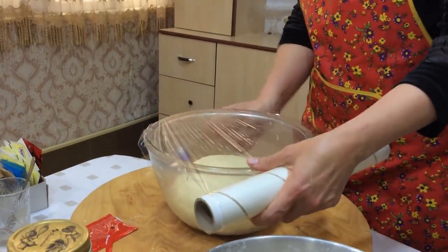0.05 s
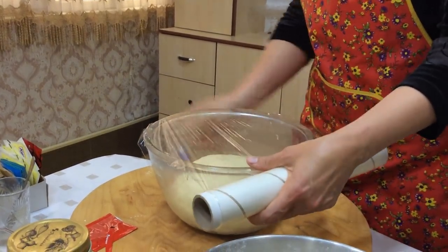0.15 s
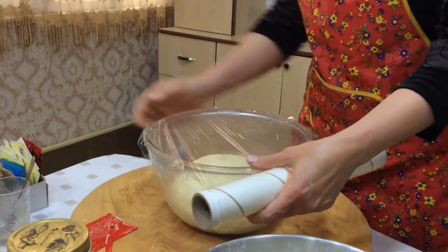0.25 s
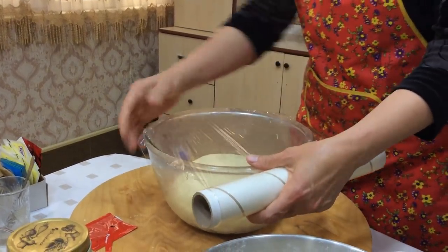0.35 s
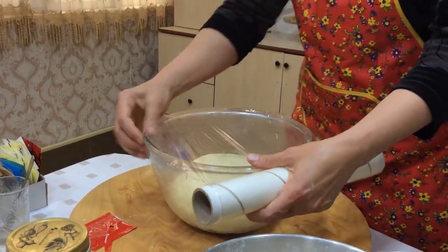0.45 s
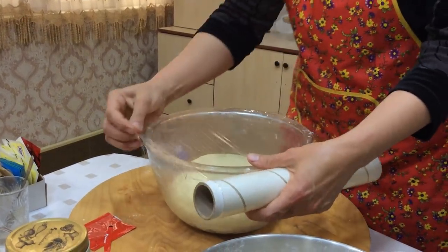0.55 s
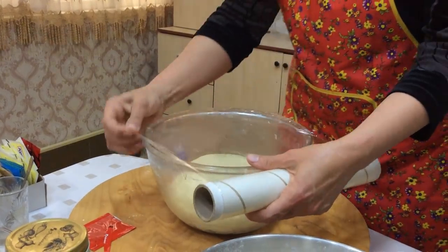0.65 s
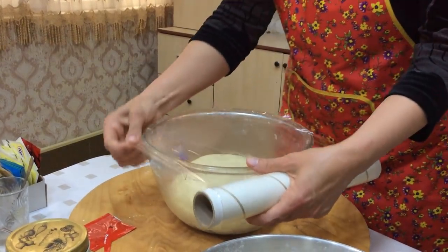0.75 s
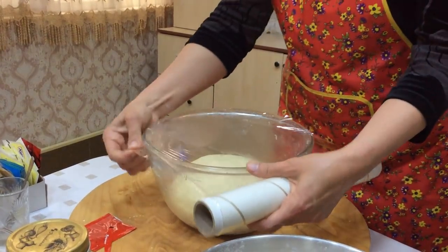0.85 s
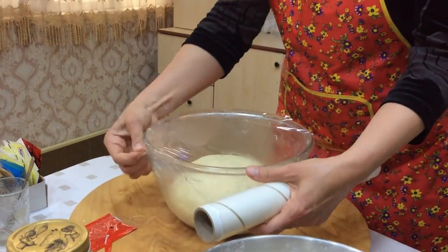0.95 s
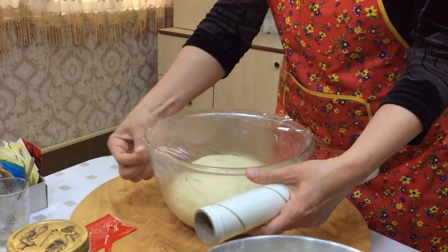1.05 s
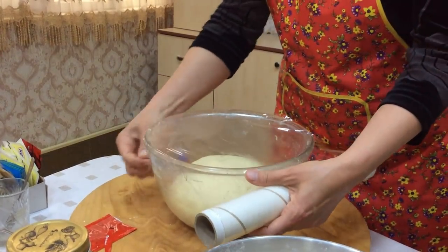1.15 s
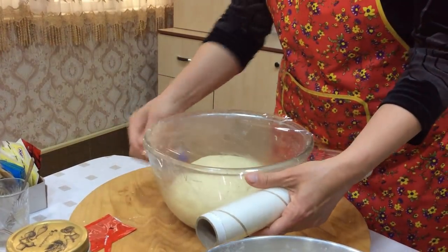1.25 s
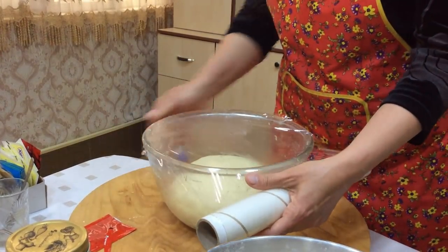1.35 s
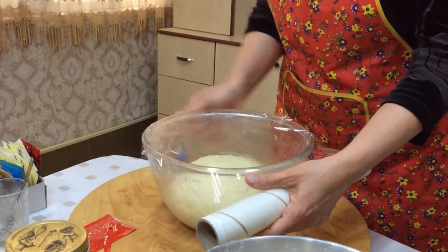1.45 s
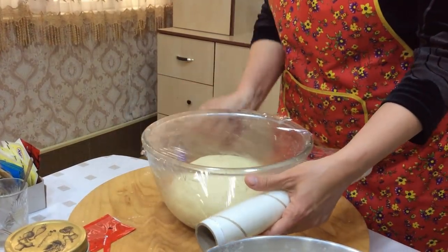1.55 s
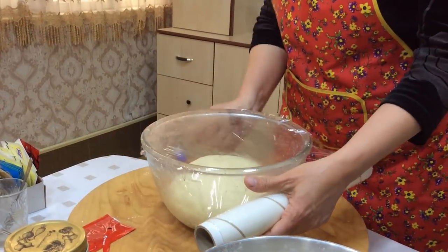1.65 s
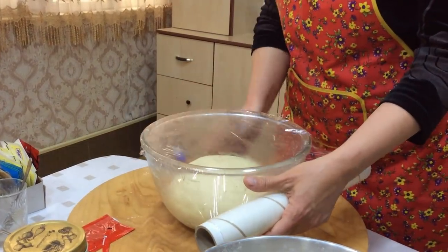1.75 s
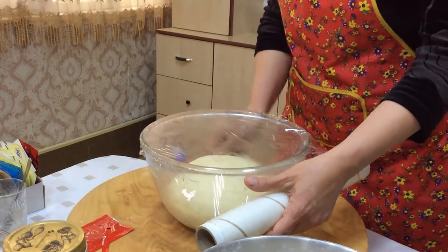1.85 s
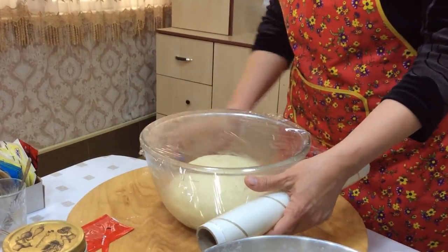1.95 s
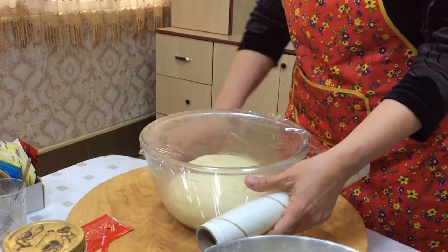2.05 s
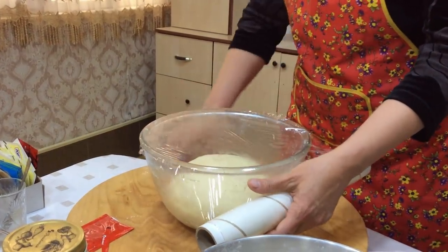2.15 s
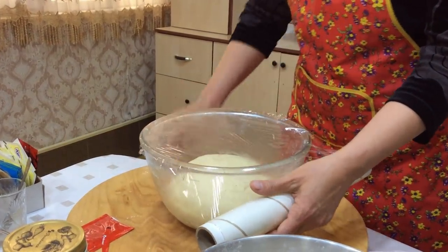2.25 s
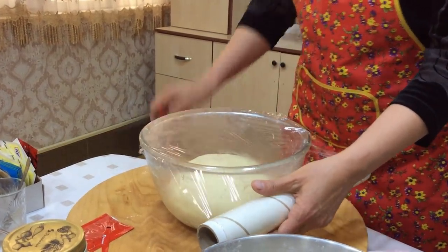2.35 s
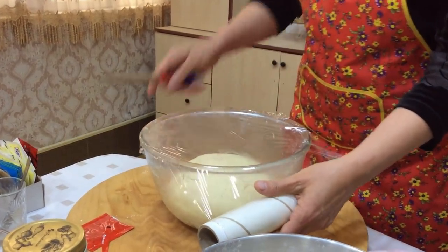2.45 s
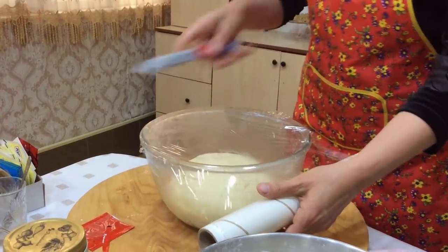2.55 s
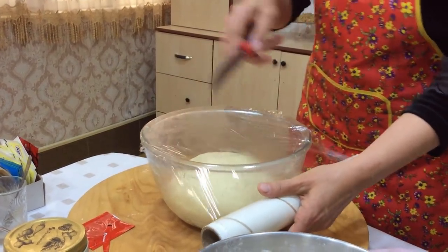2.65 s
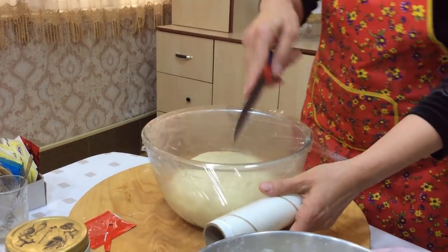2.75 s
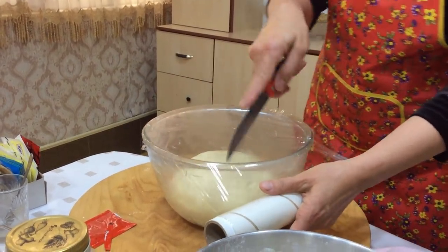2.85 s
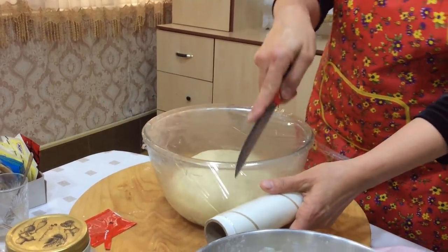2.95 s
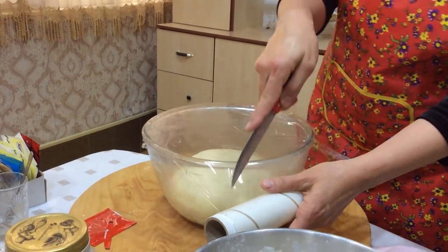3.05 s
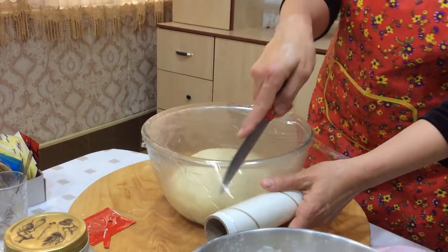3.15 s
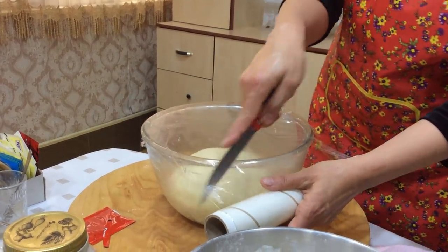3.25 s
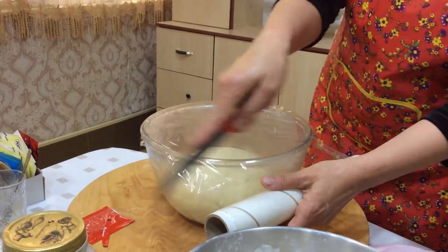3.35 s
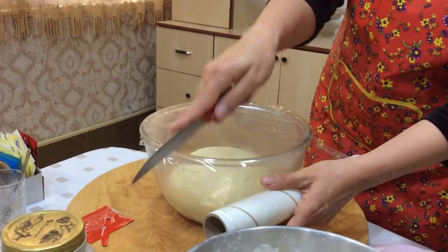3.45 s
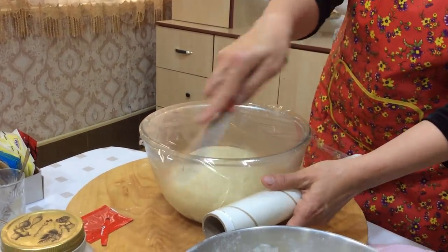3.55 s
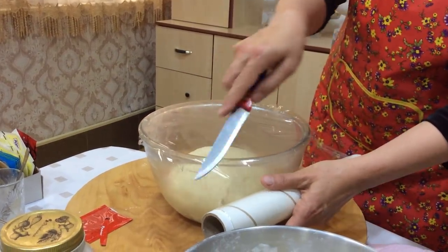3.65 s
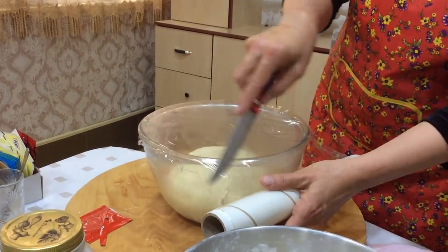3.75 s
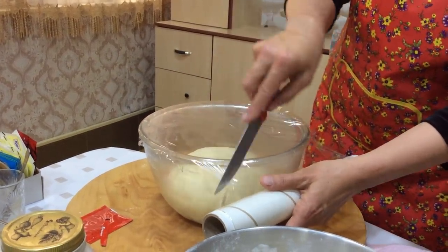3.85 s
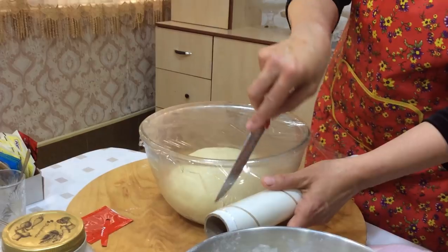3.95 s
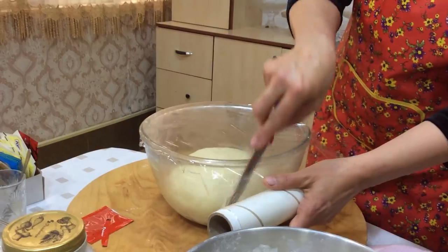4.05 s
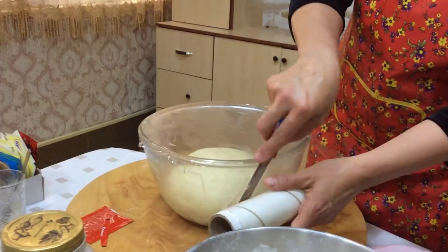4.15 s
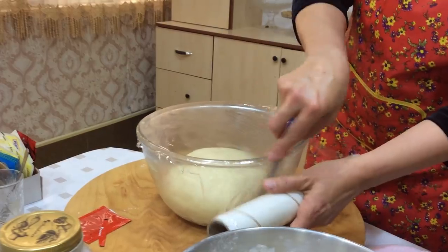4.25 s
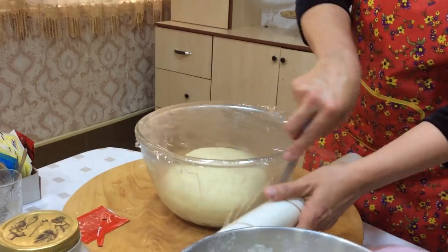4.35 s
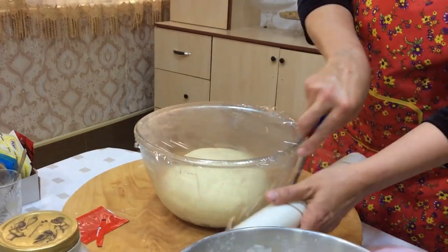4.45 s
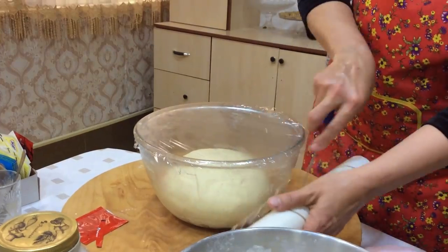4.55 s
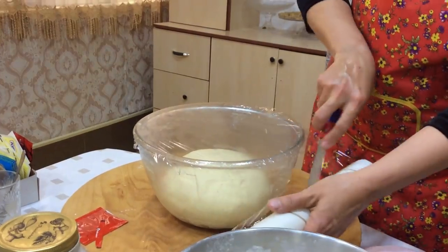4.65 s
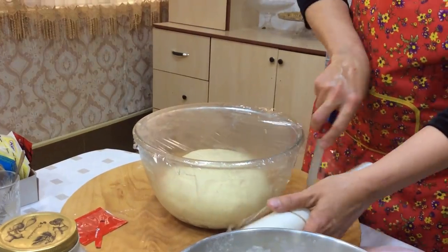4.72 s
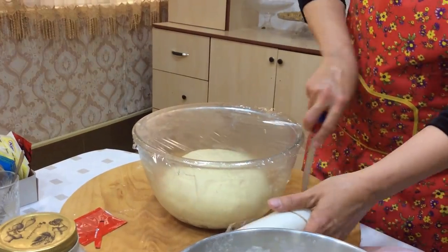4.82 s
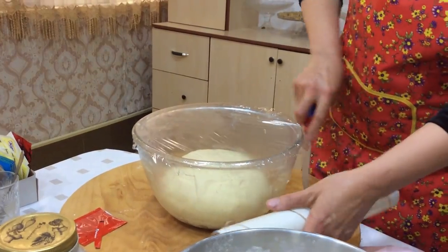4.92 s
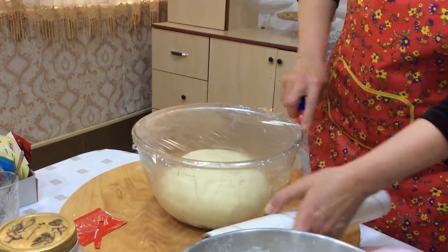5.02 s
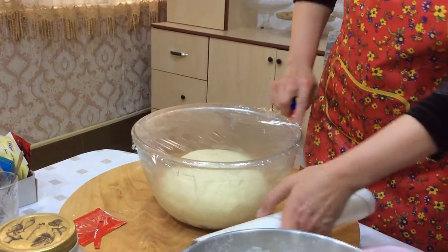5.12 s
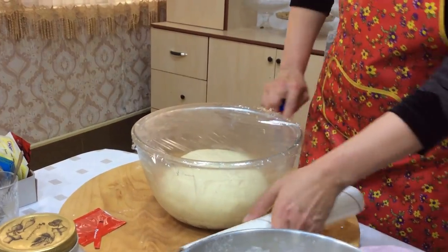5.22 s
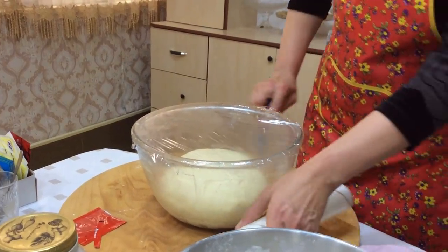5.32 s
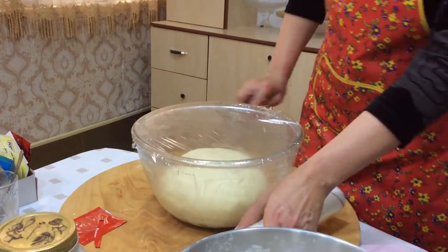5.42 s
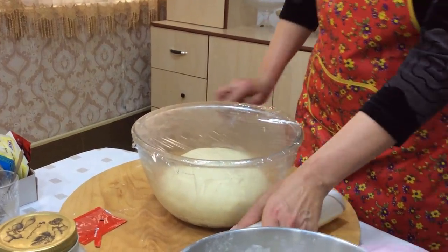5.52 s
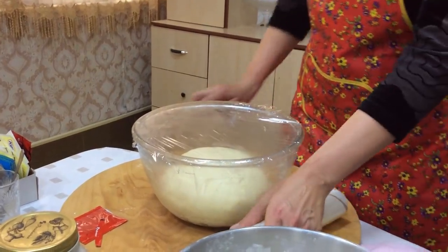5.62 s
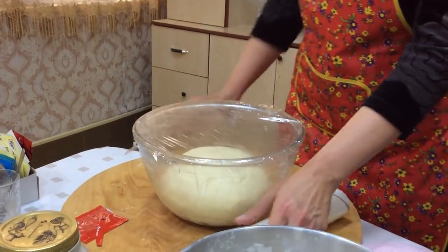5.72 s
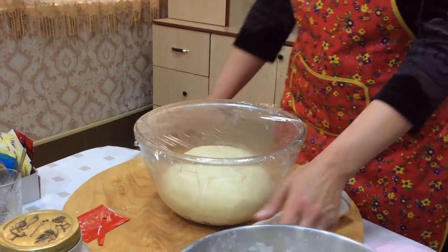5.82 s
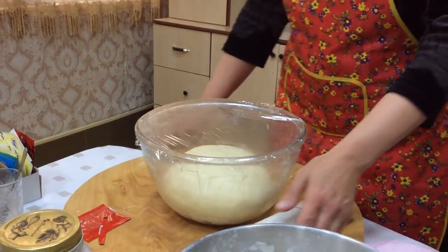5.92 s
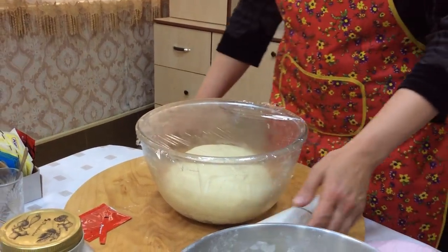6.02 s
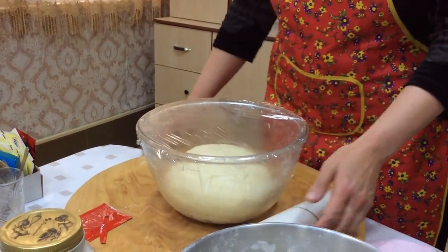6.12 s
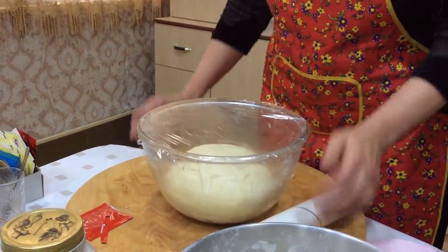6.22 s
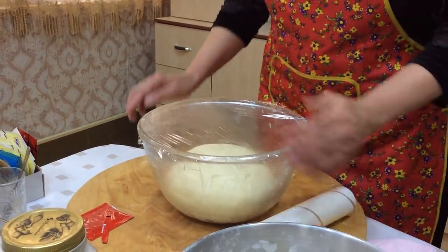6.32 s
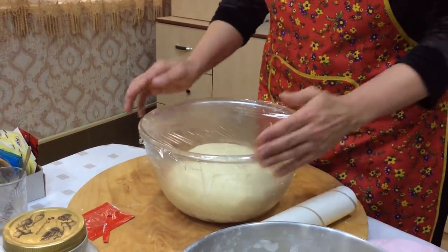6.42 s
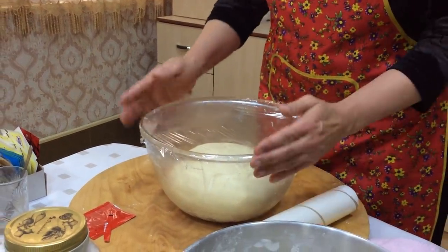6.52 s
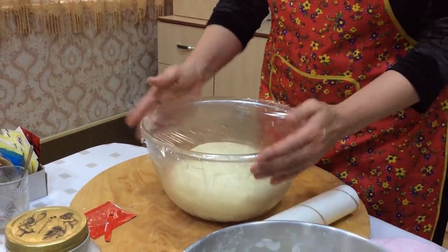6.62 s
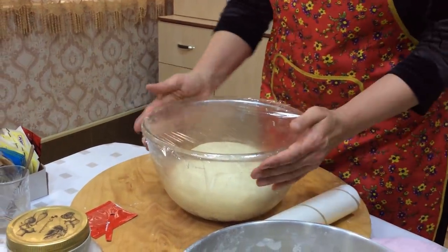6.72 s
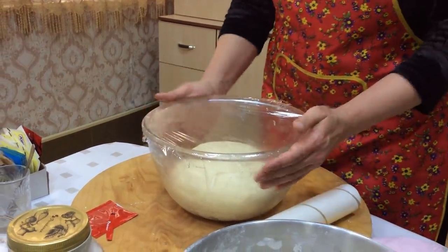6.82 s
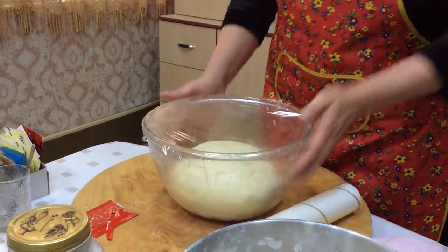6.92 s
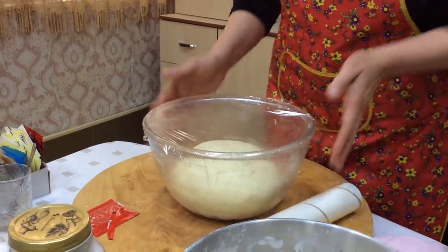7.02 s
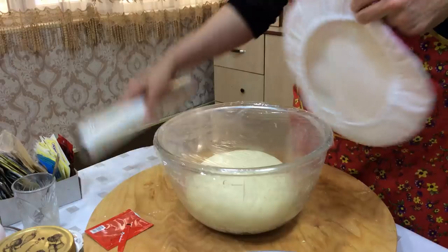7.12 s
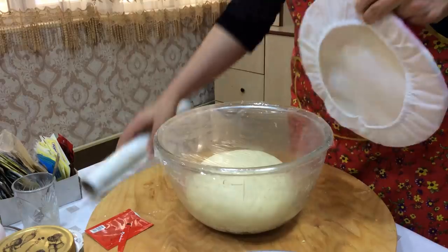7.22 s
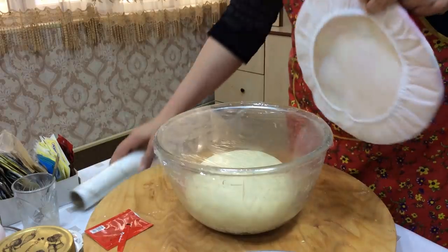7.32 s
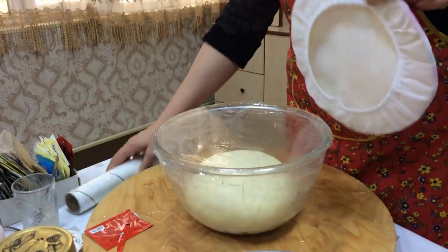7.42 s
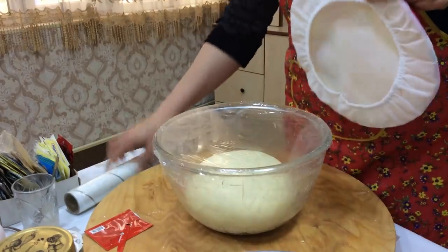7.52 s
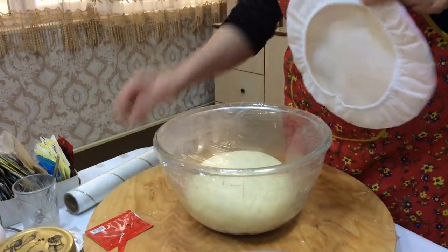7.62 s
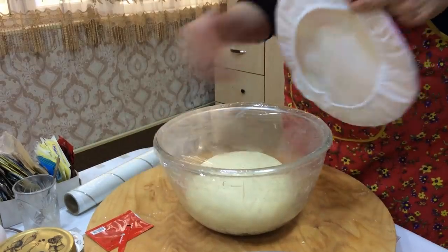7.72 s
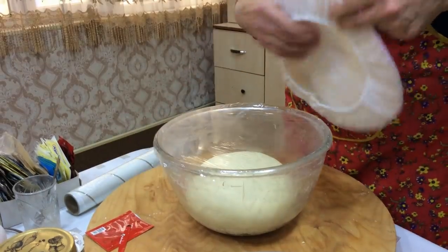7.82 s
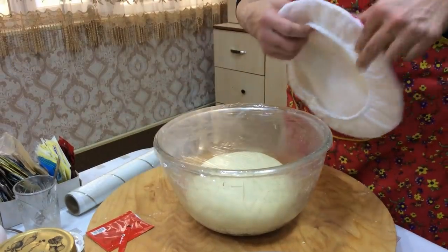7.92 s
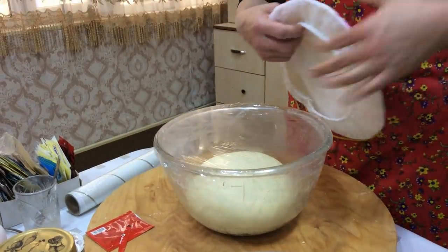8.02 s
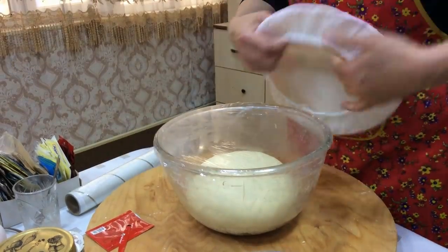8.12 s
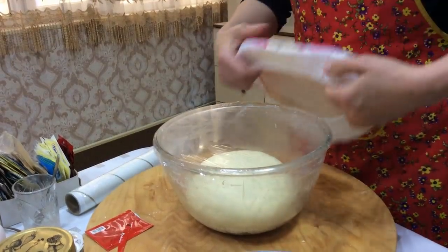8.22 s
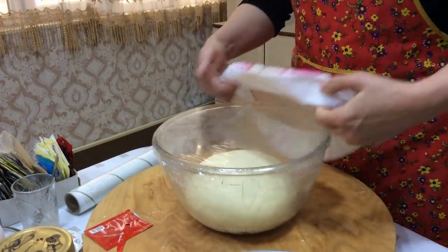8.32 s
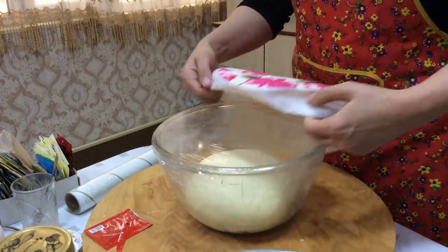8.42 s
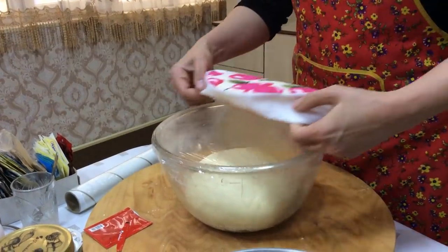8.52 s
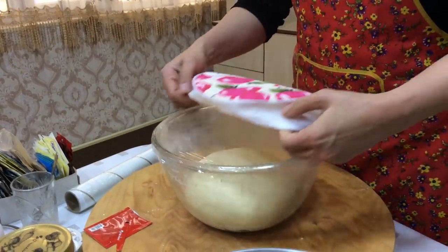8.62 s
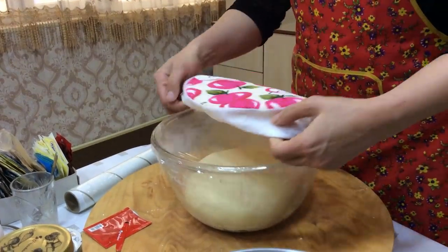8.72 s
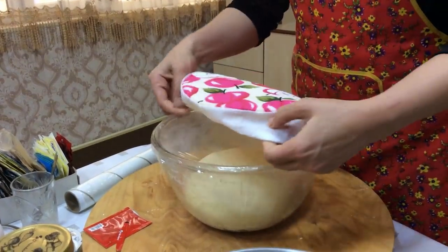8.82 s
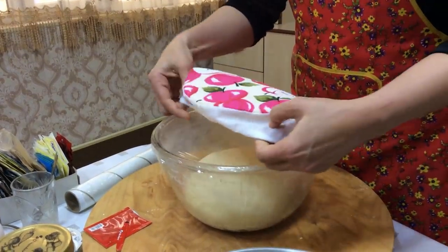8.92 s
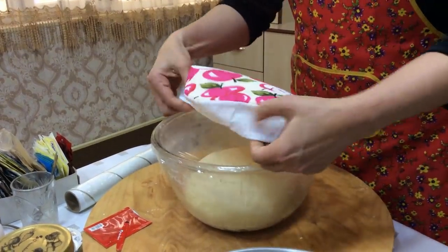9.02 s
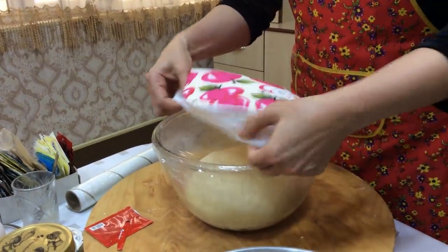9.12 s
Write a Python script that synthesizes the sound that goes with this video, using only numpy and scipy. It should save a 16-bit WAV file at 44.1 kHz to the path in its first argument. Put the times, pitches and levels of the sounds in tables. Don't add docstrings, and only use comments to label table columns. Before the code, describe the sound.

Cling film crinkles softly over a glass bowl, then a knife rips through it in sharp, crackling bursts before woody knocks in a quiet kitchen.

```python
import sys
import numpy as np
from scipy import signal
from scipy.fft import rfft, irfft, next_fast_len
from scipy.io import wavfile
from scipy.ndimage import uniform_filter1d

SR = 44100
rng = np.random.default_rng(int(sys.argv[2]) if len(sys.argv) > 2 else 0)


def output_pcm(signal):
    pcm = np.clip(np.atleast_2d(signal).T, -1, 1) * 32767
    wavfile.write(sys.argv[1], SR, np.round(pcm).astype(np.int16))


def elevation(decibels):
    levels = np.asarray(decibels, float)
    return 10 ** (levels / 20)


N = 404397

# (time [s], peak level [dB])
HAND_TAPS = [
    (2.148, -19),
    (2.188, -27),
    (2.23, -33),
    (2.25, -44),
]
ROLL_TAPS = [
    (5.637, -12.5),
    (5.676, -13.5),
    (5.728, -24),
]
ROLL_END_TAPS = [
    (.748, -40),
    (1.62, -42),
    (7.454, -23.5),
]
ROLL_FLAT_TAPS = [
    (7.557, -16.5),
    (7.566, -18),
    (7.625, -31.5),
    (7.715, -52),
]


def rms_one(x):
    return x / np.sqrt(np.mean(x ** 2) + 1e-20)


def at_hz(points, hz):
    table_hz, values = np.array(points).T
    return np.interp(np.log(hz + 1), np.log(table_hz), values)


def colour(x, spectrum):
    size = next_fast_len(N)
    gain = elevation(at_hz(spectrum, np.fft.rfftfreq(size, 1 / SR)))
    return rms_one(irfft(rfft(x, size) * gain, size)[:N])


def drift(rate_hz):
    r = np.exp(-80 * np.pi * rate_hz / SR)
    slow = signal.lfilter([1], [1, -2 * r, r * r], rng.standard_normal(N // 40 + 2002))[2000:]
    return np.interp(np.arange(N) / 40, np.arange(len(slow)), rms_one(slow))


def peak(x, hz, width_hz):
    r = np.exp(-np.pi * width_hz / SR)
    feedback = [1, -2 * r * np.cos(2 * np.pi * hz / SR), r * r]
    return signal.lfilter(np.array([1, 0, -1]) * (1 - r * r) / 2, feedback, x)


def effort(start, held, top_db, rise_db_per_s, fall_db_per_s):
    t = np.arange(0, N, 32)[:, None] / SR
    below_db = rise_db_per_s * np.clip(start - t, 0, None)
    below_db = below_db + fall_db_per_s * np.clip(t - start - held, 0, None)
    power = np.sum(elevation(2 * (top_db - below_db)), axis=1)
    return np.interp(np.arange(N) / 32, np.arange(len(t)), power)


def struck(taps, hz, mode_db, t60, rise_s, scatter=1):
    out = np.zeros(N)
    t = np.arange(int(min(t60.max(), .5) * SR)) / SR
    hz, mode_db, t60 = hz[:, None], mode_db[:, None], t60[:, None]
    phases = rng.random((len(taps), len(hz), 1))
    for (s, tap_db), phase in zip(taps, phases):
        softer_db = max(other_db for other_s, other_db in taps if other_s <= s) - tap_db
        ring_db = mode_db - 0.8 * softer_db * np.log2(hz / 300) - 60 * t / t60
        rings = np.sum(elevation(ring_db) * np.sin(2 * np.pi * (hz * t + scatter * phase)), axis=0)
        rings *= 1 - np.exp(-t / rise_s)
        i = round(s * SR)
        out[i:i + len(t)] += (elevation(tap_db) * rings / np.abs(rings).max())[:N - i]
    return out


def air():
    # (frequency [Hz], density [dB per Hz])
    air_spectrum = [(12, -54), (20, -28), (39, -13.5), (53, -3), (74, -7.5), (107, 2), (150, -9),
                    (204, -6.5), (434, -17), (738, -26), (1030, -34.5), (6540, -47.5), (8890, -31.5),
                    (14300, -47), (16000, -29.5)]
    return elevation(-53.5) * colour(rng.standard_normal(N), air_spectrum)


def fridge():
    # (frequency [Hz], width [Hz], level [dB])
    motor_lines = [(52, 10, -74), (101, 3.44, -51), (204.3, 4.55, -76), (437, 11.7, -68)]
    out = np.zeros(N)
    for hz, width_hz, line_db in motor_lines:
        cycles = np.cumsum(hz + 0.459 * width_hz * drift(width_hz)) / SR
        level_db = line_db + drift(3.9 * width_hz)
        out += np.sqrt(2) * elevation(level_db) * np.sin(2 * np.pi * cycles)
    return out


def shifting():
    # (time of full strength [s], held [s], rumble level [dB])
    nudges = [(0.02, 0.016, -50.5), (2.2, 0.078, -66), (3.3, 0.054, -39.5), (4.95, 0.1, -55),
              (5.8, 0.12, -55), (6.15, 0.029, -44), (7.55, 0.3, -50.5), (8.45, 0.18, -52.5),
              (8.1, 0.2, -57.5), (9.02, 0.11, -51), (7.3, 0.2, -52.5)]
    band = signal.butter(2, [115, 380], "band", fs=SR, output="sos")
    rumble = rms_one(signal.sosfilt(band, rng.standard_normal(N)))
    power = elevation(2 * -59) + effort(*np.transpose(nudges), rise_db_per_s=100, fall_db_per_s=97)
    lumps_db = -4 + 4.05 * np.tanh(drift(34))
    return np.sqrt(power) * elevation(lumps_db) * rumble


def knock(taps, spectrum, t60_s, rise_s):
    hz = np.geomspace(125, 6500, 110) * (1 + .015 * rng.standard_normal(110))
    t60 = t60_s * (hz / 500) ** -.6
    mode_db = at_hz(spectrum, hz) + 10 * np.log10(hz / t60) + 0.67 * rng.standard_normal(110)
    return struck(taps, hz, mode_db, t60, rise_s)


def knocks():
    # (time [s], peak level [dB])
    pickup_taps = [
        (1.555, -44),
        (2.304, -25.5),
        (2.321, -29.5),
        (2.345, -43),
    ]
    blade_taps = [
        (4.934, -20.5),
    ]
    knife_taps = [
        (5.965, -29),
        (6.11, -10.5),
        (6.1145, -12.5),
        (6.125, -21),
        (6.228, -39),
    ]
    # (frequency [Hz], density [dB per Hz])
    hand_colour = [(76, -46), (130, 0.5), (200, 0.5), (270, -15), (380, -10), (646, -10.5), (753, -9.5),
                   (904, -20), (1170, -16), (1690, -28), (2260, -25.5), (3400, -24.5), (4100, -43),
                   (5000, -36), (6500, -68), (11000, -120)]
    pickup_colour = [(180, -44), (300, -17), (749, -1.5), (871, -6.5), (1150, -7.5), (2000, -11),
                     (2500, -6), (3090, -11), (4250, -10), (4900, -24), (6000, -20), (7800, -68),
                     (13200, -120)]
    blade_colour = [(150, -41), (250, -3.5), (335, 2), (873, 3), (1180, -1), (1280, -4), (1840, -6),
                    (2180, -11), (6000, -29), (7800, -65), (13200, -120)]
    knife_colour = [(88, -42.5), (150, -18.5), (400, -7.5), (570, -3.5), (720, 1), (1120, -12.5),
                    (1410, -8.5), (1670, -17), (1860, -16.5), (2070, -19.5), (2750, -13), (3200, -27.5),
                    (4000, -40), (6000, -45), (7800, -74), (13200, -120)]
    roll_colour = [(71, -32), (120, -7.5), (200, -1), (296, -5), (372, -4), (560, -10.5), (846, -21),
                   (994, -34), (1150, -19), (1280, -32), (1600, -25), (3000, -44), (3900, -43),
                   (6600, -120)]
    roll_end_colour = [(71, -34), (120, -2), (167, 10.5), (321, 2), (739, -48), (866, -17), (1500, -83),
                       (1950, -81), (3300, -120)]
    roll_flat_colour = [(71, -40), (120, -5), (194, -5), (285, -12.5), (386, -2), (456, -6), (560, -4),
                        (693, -3.5), (1000, -19.5), (1050, -52), (2500, -47), (3250, -71), (5500, -120)]
    hand = knock(HAND_TAPS, hand_colour, t60_s=0.055, rise_s=0.00035)
    knife = knock(pickup_taps, pickup_colour, t60_s=0.12, rise_s=0.00021)
    knife += knock(blade_taps, blade_colour, t60_s=0.13, rise_s=0.00032)
    knife += knock(knife_taps, knife_colour, t60_s=0.052, rise_s=0.0011)
    roll = knock(ROLL_TAPS, roll_colour, t60_s=0.046, rise_s=0.0015)
    roll += knock(ROLL_END_TAPS, roll_end_colour, t60_s=0.045, rise_s=0.0011)
    roll += knock(ROLL_FLAT_TAPS, roll_flat_colour, t60_s=0.032, rise_s=0.0031)
    return signal.sosfilt(signal.butter(2, 125, "high", fs=SR, output="sos"), hand + knife + roll)


def clear_notes(taps, modes, level_db, rise_s):
    return elevation(level_db) * struck(taps, *np.transpose(modes), rise_s, scatter=.15)


def board():
    # (time [s], level [dB])
    knife_rings = [
        (5.965, -40),
        (6.11, -6.5),
        (6.1145, -13),
        (6.125, -17),
        (6.228, -27),
    ]
    # (frequency [Hz], level [dB], t60 [s])
    hand_modes = [(194, -5.5, 0.15), (382, -1, 0.17), (765, -1.5, 0.064), (996, -13, .09),
                  (1180, -16, 0.22)]
    knife_modes = [(316, -14, 0.16), (396, -9.5, 0.26), (420, -5, 0.28), (476, -23, 0.28), (691, 9, 0.085),
                   (867, -25, 0.11), (1166, -1, 0.14), (1250, -26, 0.16), (1383, -6, .2), (1590, -11, 0.3),
                   (2020, -20, 0.12), (248, -8.5, 0.091)]
    roll_modes = [(146.3, -0.5, 0.24), (250.6, -4, 0.29), (338, -0.5, 0.18), (420, 0, 0.27),
                  (603, -8, 0.17), (840, -21, 0.18), (1190, -24, 0.24), (1610, -9.5, .05)]
    roll_end_modes = [(198, -2.5, 0.72), (255, -1, 0.22), (319, -10, 0.17), (386, -6, 0.27)]
    roll_flat_modes = [(154, -16, 0.35), (194.5, -3.5, 0.14), (335, -10, 0.21), (370, -2, .13),
                       (420, -6, 0.12), (466, -5, 0.18), (519, -5.5, 0.16), (710, 1.5, 0.073),
                       (923, -16.5, 0.25)]
    return (clear_notes(HAND_TAPS, hand_modes, -7.5, rise_s=0.001)
            + clear_notes(knife_rings, knife_modes, -7, rise_s=0.0003)
            + clear_notes(ROLL_TAPS, roll_modes, -5, rise_s=0.0019)
            + clear_notes(ROLL_END_TAPS, roll_end_modes, -5.5, rise_s=0.0016)
            + clear_notes(ROLL_FLAT_TAPS, roll_flat_modes, -6, rise_s=0.0024))


def glass():
    # (frequency [Hz], level [dB], t60 [s])
    bowl_modes = [(1040, -5, 1), (1948, 9, 0.71), (1970, 11, 0.31)]
    # (time [s], level [dB])
    bowl_taps = [(.63, -62), (1.205, -62), (1.27, -56.5), (1.424, -54), (1.555, -64), (3.35, -48),
                 (4.68, -46), (6.531, -80), (6.712, -77), (6.9, -66)]
    # (time [s], level [dB], frequency [Hz], t60 [s])
    single_notes = [(0.624, -43, 1527, 0.027), (1.321, -54, 2740, 0.072), (1.427, -44.5, 406, 0.23),
                    (1.47, -60, 1040, 0.82), (1.555, -56, 1030, 0.48), (3.45, -53.5, 1040, 0.82),
                    (1.83, -61, 1940, 0.37), (6.941, -61.5, 1945, 0.37), (2.11, -59, 1450, .3),
                    (8.0, -54, 1240, 0.1), (1.553, -62, 2490, 0.045), (3.955, -50.5, 840, 0.029),
                    (4.015, -46.5, 820, 0.063), (4.06, -45, 780, 0.037), (4.791, -44, 386, 0.42),
                    (4.94, -46.5, 1510, 0.54), (4.94, -49, 1444, 0.53), (4.94, -39, 842, .2),
                    (3.403, -38, 940, 0.17), (3.403, -43, 1420, 0.18), (3.42, -42, 2290, .12),
                    (5.966, -35.5, 610, 0.06), (5.966, -45.5, 2840, 0.016), (6.228, -35.5, 680, 0.13),
                    (5.32, -63, 2750, 0.22), (6.008, -47, 2800, 0.026), (6.53, -68, 3130, 0.36),
                    (6.711, -64, 3070, 0.59), (6.901, -76, 3160, 0.58)]
    out = struck(bowl_taps, *np.transpose(bowl_modes), rise_s=0.0036)
    for s, note_db, hz, t60 in single_notes:
        out += struck([(s, note_db)], *np.transpose([(hz, 0, t60)]), rise_s=0.0024)
    return out


def stretch():
    # (time [s], frequency [Hz], level [dB])
    pull_curve = [(0.8, 401, -59), (0.88, 323.6, -53), (0.968, 321.5, -51), (0.996, 330, -68),
                  (1.02, 335, -54.5), (1.162, 385, -70), (1.2, 420, -70)]
    t = np.arange(N) / SR
    curve_s, curve_hz, curve_db = np.transpose(pull_curve)
    phase = 2 * np.pi * np.cumsum(np.interp(t, curve_s, curve_hz)) / SR
    level_db = np.interp(t, curve_s, curve_db)
    on = np.clip(np.minimum(t - curve_s[0], curve_s[-1] - t) / .02, 0, 1)
    return on * np.sqrt(2) * elevation(level_db) * (np.sin(phase) + elevation(-36) * np.sin(2 * phase))


def sliding():
    # (time of full strength [s], held [s], level [dB])
    slides = [
        (4.88, 0.066, -44),
        (5.0, .02, -48),
        (5.04, 0.021, -42),
    ]
    treble = signal.butter(2, 6500, "high", fs=SR, output="sos")
    hiss = rms_one(signal.sosfilt(treble, rng.standard_normal(N)))
    return np.sqrt(effort(*np.transpose(slides), rise_db_per_s=200, fall_db_per_s=800)) * hiss


def handling():
    # (time of full strength [s], held [s], bright rustle [dB], dull rustle [dB])
    hand_strokes = [(.18, 0.012, -60.5, -62), (.33, 0.038, -70, -59.5), (.57, .04, -57, -78),
                    (0.626, 0.0074, -48.5, -55), (.83, 0.22, -57.5, -70), (1.19, 0.1, -56, -67),
                    (1.32, 0.29, -82, -64), (1.43, 0.012, -79, -70), (1.555, 0.067, -65, -66.5),
                    (1.62, 0.12, -58, -61.5), (1.821, 0.038, -52.5, -67), (1.9, 0.17, -66, -65),
                    (2.15, .01, -57.5, -61), (2.31, 0.022, -59, -56), (2.52, 0.0092, -63.5, -83),
                    (5.35, 0.028, -78, -61.5), (5.66, 0.023, -55.5, -66), (5.79, 0.018, -63.5, -78),
                    (5.965, 0.1, -79, -59), (6.112, .002, -67, -52.5), (6.15, 0.021, -61.5, -54.5),
                    (6.53, 0.044, -58, -64), (6.742, 0.035, -50.5, -85), (6.88, 0.12, -52.5, -84),
                    (7.201, 0.098, -59.5, -65.5), (7.549, 0.087, -61.5, -60), (7.93, 0.07, -53.5, -59.5),
                    (8.19, 0.046, -58.5, -60.5), (8.35, 0.21, -61.5, -64.5), (8.6, 0.52, -67, -66.5)]
    blade_strokes = [(3.2, 0.022, -46, -46), (3.27, .005, -56, -49), (3.308, .03, -45, -43),
                     (3.352, .01, -42, -40), (3.375, 0.065, -36.5, -40), (3.96, 0.11, -62, -60.5),
                     (4.08, 0.092, -73, -55), (4.15, 0.015, -51, -42), (4.22, 0.015, -46.5, -37.5),
                     (4.328, .002, -37.5, -43), (4.35, 0.047, -29, -45), (4.42, .012, -37, -44.5),
                     (4.473, 0.028, -34.5, -44), (4.676, 0.048, -36.5, -42), (4.78, 0.024, -40.5, -48.5),
                     (4.55, .1, -47, -53), (4.84, 0.17, -51.5, -58.5), (5.0, 0.037, -54, -79)]
    hand, blade = np.transpose(hand_strokes), np.transpose(blade_strokes)
    levels_db = []
    for column, rest_db in ((2, -65.5), (3, -67)):
        power = elevation(2 * rest_db)
        power = power + effort(*hand[:2], hand[column], rise_db_per_s=324, fall_db_per_s=154)
        power = power + effort(*blade[:2], blade[column], rise_db_per_s=1299, fall_db_per_s=225)
        levels_db.append(10 * np.log10(power))
    return levels_db


def rustle():
    # (frequency [Hz], density [dB per Hz])
    crinkle_spectrum = [(1800, -21), (2400, -19), (3680, -14.5), (4930, -12), (6560, -8), (13200, -8),
                        (15500, -10)]
    rub_spectrum = [(290, -2.5), (500, 1.5), (771, 0.5), (917, 2.5), (1260, -0.5), (1430, 1), (5000, -7),
                    (6500, -18.5), (11000, -120)]
    bright_db, dull_db = handling()
    sizes = elevation(3.6 * np.minimum(rng.exponential(1, N), 3)) * rng.choice([-1, 1], N)
    creases_per_s = 3500 * elevation(4 * drift(25))
    grains = rms_one(sizes * (rng.random(N) < creases_per_s / SR))
    grainy = np.clip((bright_db + 62) / 25, 0, .6)
    mix = np.sqrt(grainy) * grains + np.sqrt(1 - grainy) * rng.standard_normal(N)
    bright = elevation(bright_db + 1.8 * drift(27)) * colour(mix, crinkle_spectrum)
    bright += 2.04 * grainy * peak(bright, 2900, 1600)
    rub = colour(0.4 * mix + rng.standard_normal(N), rub_spectrum)
    return bright + elevation(dull_db + 3.45 * np.tanh(drift(26))) * rub


def snaps(rows, splinter_db):
    # (frequency [Hz], width [Hz], level [dB])
    skin_modes = [(335, 250, 7), (598, 86, 14.5), (820, 83, 12.5), (1503, 110, 5)]
    bright, thud = np.zeros(N), np.zeros(N)
    t = np.arange(512) / SR
    for s, snap_db, hz, thud_db in rows:
        white = rng.standard_normal(512)
        burst = elevation(splinter_db) * white * elevation(-60 * t / .011)
        burst[:4] += [-.7, -.7, 1.6, .9]
        ringing = peak(burst, np.clip(hz, 1500, 14000), 0.89 * hz)
        burst = ringing + 0.12 * burst + 0.14 * np.diff(burst, prepend=0)
        lag = int(75 + 20 * np.tanh(white[-1]))
        burst += 0.28 * np.roll(burst, lag) * (t > lag / SR)
        i = round((s + .0006) * SR)
        bright[i:i + 512] += elevation(snap_db) * burst / np.abs(burst).max()
        thud[i] += elevation(snap_db + thud_db)
    skin = np.zeros(N)
    for k, (hz, width_hz, mode_db) in enumerate(skin_modes):
        skin += (-1) ** k * elevation(mode_db) * peak(thud, hz, 0.78 * width_hz)
    bright = signal.lfilter(*signal.butter(2, 1350, "high", fs=SR), bright)
    return bright + elevation(15) * skin


def film_snaps():
    # (time [s], peak level [dB], centre frequency [Hz], drum-skin thud relative to the snap [dB])
    pulling = [(0.5646, -36, 7470, -27), (0.5904, -33, 9200, -22), (0.626, -23.5, 5100, -21),
               (0.6354, -29, 9390, -6), (0.6524, -32, 9400, -4), (0.7567, -43, 8820, -15),
               (0.82, -35.5, 9240, -31), (0.8405, -29, 12400, -42), (0.8974, -33, 9940, -29),
               (0.9512, -38, 7420, -25), (0.9602, -31, 10900, -33), (0.9764, -43, 11700, -28),
               (0.9981, -35, 11100, -32), (1.0745, -34, 7600, -33), (1.2506, -33.5, 9530, -34),
               (1.3219, -38, 2780, -18), (5.783, -39, 11500, -40), (5.9655, -40, 5000, -30),
               (6.009, -41, 6000, -30), (6.1145, -31.5, 6000, -27), (6.7436, -45, 3140, -25),
               (7.9209, -49.5, 2420, 12)]
    first_slit = [(3.1914, -13.5, 4930, -6), (3.2011, -37, 4000, -22), (3.2163, -26, 6100, -25),
                  (3.2684, -19.5, 5040, -12), (3.2766, -26, 2770, -30), (3.3053, -32, 3000, -20),
                  (3.3118, -17, 4500, -5), (3.3222, -21, 4500, -15), (3.3265, -20, 7000, -8),
                  (3.3356, -20, 6000, -3), (3.3483, -7, 3370, -5.5), (3.35, -28, 4500, -13),
                  (3.3732, -10, 7000, -14), (3.3772, -20, 4500, 6), (3.3859, -10, 4500, -8),
                  (3.3953, -4, 4170, -7.5), (3.3985, -9, 4960, -13), (3.3995, -4.5, 4280, -33)]
    second_slit = [(4.0518, -23.5, 7500, -14), (4.068, -31.5, 6000, -10), (4.093, -17, 8000, -17),
                   (4.0957, -17.5, 2980, -20), (4.1078, -33, 6000, -25), (4.1233, -19, 3460, -12),
                   (4.14, -19.5, 4460, -19), (4.1477, -5, 4770, -24), (4.1574, -30, 5030, -25),
                   (4.2068, 0, 5100, -12.5), (4.218, -26, 6000, -11), (4.222, -19, 4210, -22),
                   (4.224, -24, 9000, -28), (4.2274, -4.5, 7950, -39), (4.2323, -8, 5000, -19),
                   (4.3235, -18, 2960, -32), (4.326, -8, 5050, -41), (4.3364, -7, 5940, -49),
                   (4.348, -10, 7000, -10.5), (4.3482, -2.5, 8000, -33), (4.3635, -11, 7500, -40),
                   (4.375, -13, 7500, -53), (4.3929, -4.5, 6200, -25), (4.414, -15, 6350, -26),
                   (4.4397, -18, 6490, -41), (4.448, -10, 5020, -36), (4.4524, -13, 6600, -33),
                   (4.472, -10.5, 4600, -15), (4.4964, -16, 4860, -35), (4.5108, -17.5, 6000, -40),
                   (4.5904, -15.5, 9300, -33), (4.5979, -19, 9450, -28), (4.679, -14.5, 5300, -19),
                   (4.7776, -20, 5560, -10), (4.7851, -7.5, 7600, -36)]
    further_slit_snaps = [(3.4095, -17, 4500, -15), (3.414, -19, 6500, -8), (3.4015, -26, 4300, -17),
                          (3.955, -38.5, 6500, -20), (4.2095, -25.5, 5500, -18.5), (4.3371, -14, 6000, -39),
                          (4.3502, -14, 9000, -22), (4.3518, -11, 5000, -29.5), (4.3955, -25, 12000, -39),
                          (4.398, -13, 12000, -40), (4.4775, -16, 6000, -35), (4.49, -17, 10000, -40),
                          (4.5702, -34, 8000, -35), (4.694, -22, 6000, -26), (4.716, -22, 6000, -30),
                          (4.803, -19, 7000, -30)]
    slitting = [*first_slit, *second_slit, *further_slit_snaps]
    return snaps(pulling, splinter_db=-5) + snaps(slitting, splinter_db=-8.5)


def kitchen(x):
    # (frequency [Hz], t60 [s])
    room_decay = [(100, 0.79), (300, 0.35), (800, 0.41), (2000, 0.48), (5000, 0.54), (14000, 0.25)]
    t = np.arange(int(.7 * SR)) / SR
    tail = np.zeros(len(t))
    for low in 60 * 2 ** np.arange(8):
        band = signal.butter(2, [low, 2 * low], "band", fs=SR, output="sos")
        fade = elevation(-60 * t / at_hz(room_decay, 2.7 * low))
        tail += signal.sosfilt(band, rng.standard_normal(len(t))) * fade
    lines = signal.stft(tail, nperseg=2048, noverlap=1536)[2]
    power = uniform_filter1d(np.abs(lines) ** 2, size=5, axis=1) + 1e-20
    broad, narrow = uniform_filter1d(power, size=40, axis=0), uniform_filter1d(power, size=3, axis=0)
    tail = signal.istft(lines * np.sqrt(broad / narrow), nperseg=2048, noverlap=1536)[1][:len(t)]
    tail *= np.clip((t - .003) / 0.0021, 0, 1)
    return signal.fftconvolve(x, tail / np.sqrt(np.sum(tail ** 2)))[:N]


def scene():
    film, wood = film_snaps(), knocks()
    dull = signal.lfilter(*signal.butter(1, 1800, fs=SR), wood)
    room = kitchen(elevation(-10) * film + elevation(-7.5) * dull)
    table = elevation(-2.5) * wood + board() + shifting()
    sheet = film + rustle() + stretch() + sliding()
    return (air() + fridge() + table + glass() + sheet + room)[None]


def thin_out(x):
    # (moment number [1024 samples each], thinned above [Hz])
    starved = [(3, 2100), (79, 500), (80, 500), (89, 1100), (102, 3800), (107, 2400), (123, 2400),
               (148, 4500), (161, 1700), (163, 2100), (202, 20), (207, 700), (254, 1200), (256, 1200),
               (264, 3600), (266, 3300), (280, 1400), (292, 700), (298, 700), (304, 1000), (318, 1000),
               (319, 1800), (340, 1900), (345, 2800), (349, 1300), (358, 1200)]
    out, hz = x.copy(), np.fft.rfftfreq(2048, 1 / SR)
    window = np.sqrt(np.hanning(2048))
    for moment, from_hz in starved:
        i = 1024 * moment - 957
        lines = rfft(x[i:i + 2048] * window)
        height = np.abs(lines) / uniform_filter1d(np.abs(lines), size=120) * (hz + 500) ** -.12
        high = hz > from_hz
        strongest = height > np.quantile(height[high], 1 - .05)
        strong = uniform_filter1d(1. * strongest, size=3) > 0
        out[i:i + 2048] += window * irfft(lines * high * np.where(strong, .35, -1))
    return out


def roll_off(x):
    return signal.sosfilt(signal.butter(12, 16480, fs=SR, output="sos"), x)


def record(dry):
    # (start [s], end [s])
    gap = (7.1335, 7.1813)
    t = np.arange(N) / SR
    x = thin_out(dry[0])[None] * np.where((t > gap[0]) & (t < gap[1]), .005, 1)
    x = np.tanh(x)
    x = signal.sosfilt(signal.ellip(7, .5, 38, 15250, fs=SR, output="sos"), x)
    return roll_off(x)


dry = scene()
out = record(dry)
output_pcm(out)
```